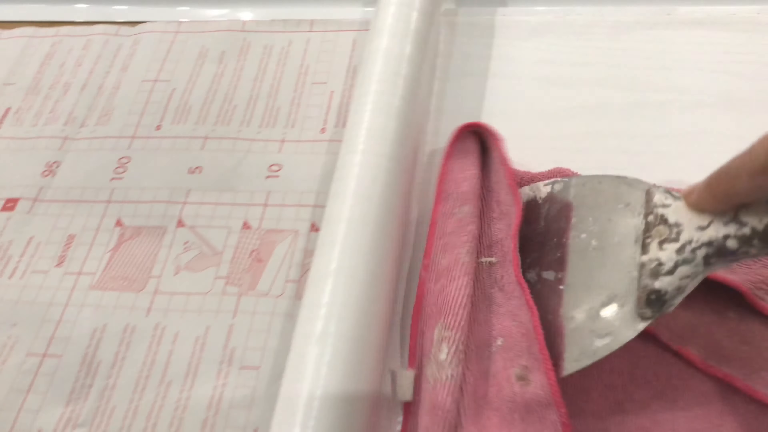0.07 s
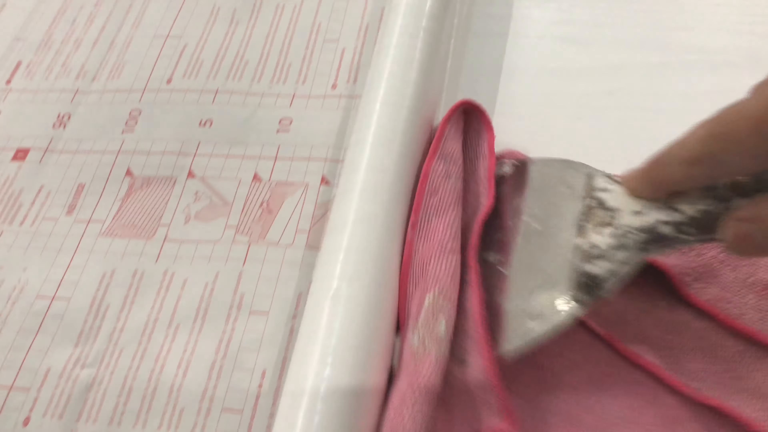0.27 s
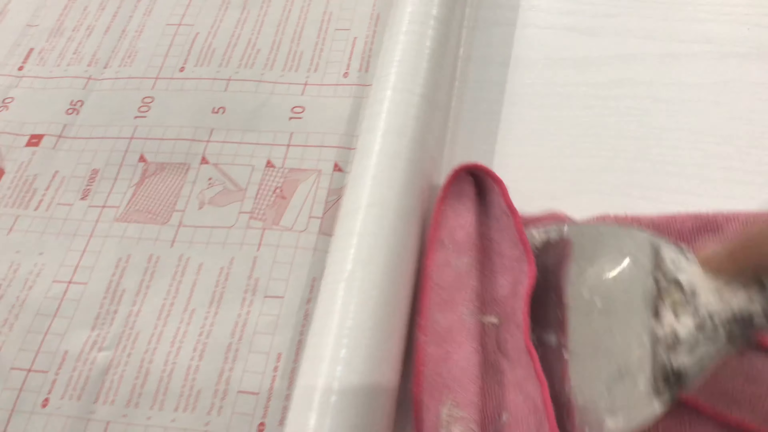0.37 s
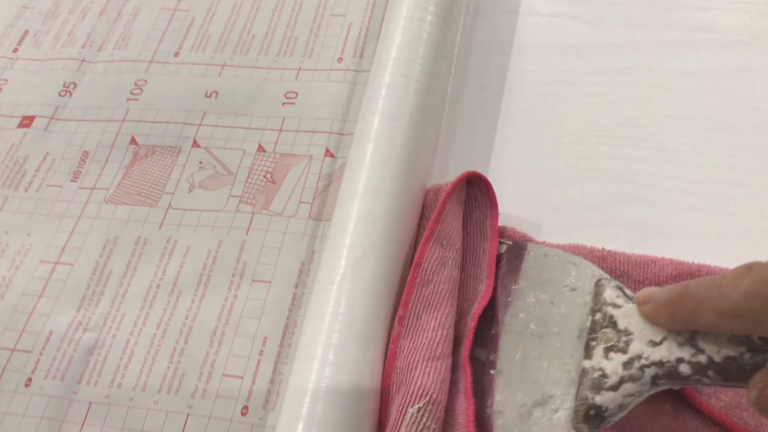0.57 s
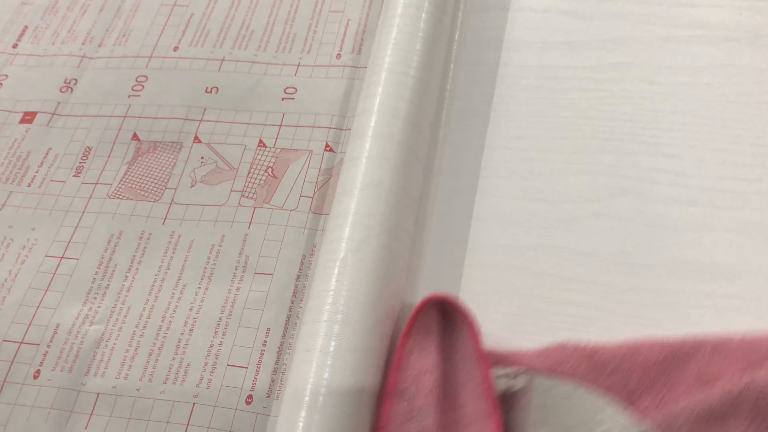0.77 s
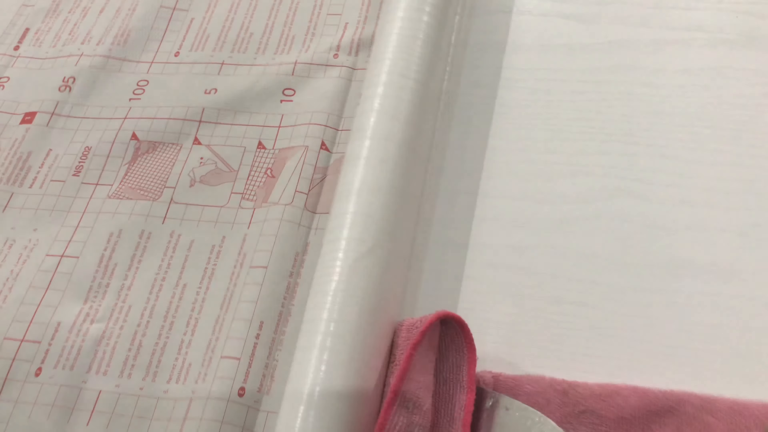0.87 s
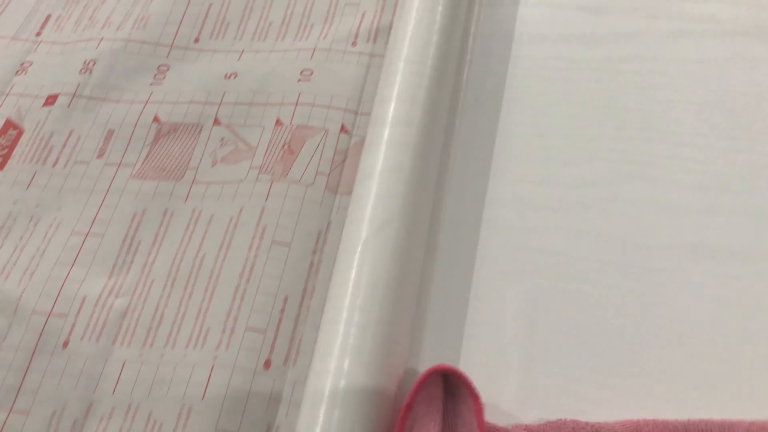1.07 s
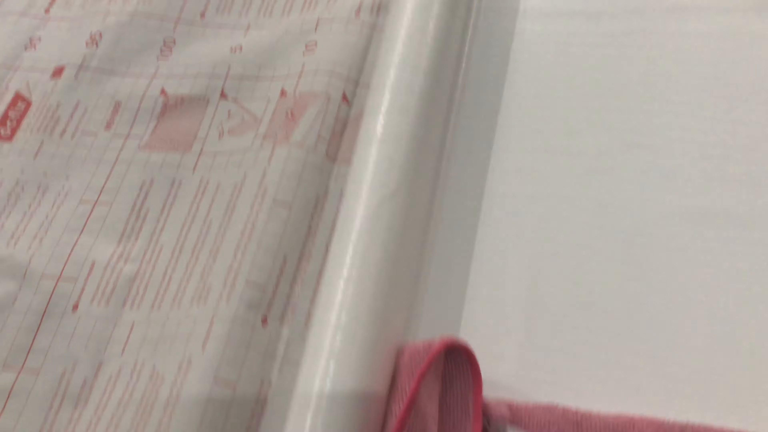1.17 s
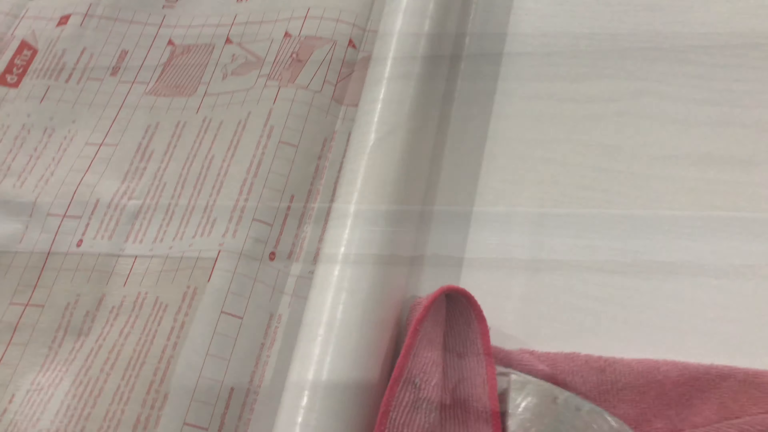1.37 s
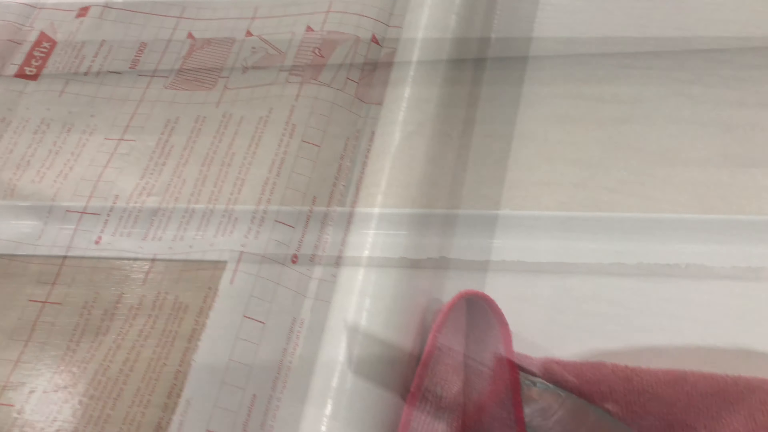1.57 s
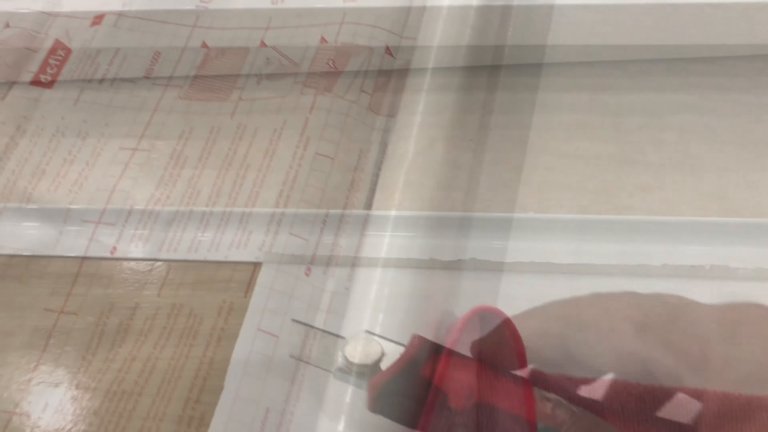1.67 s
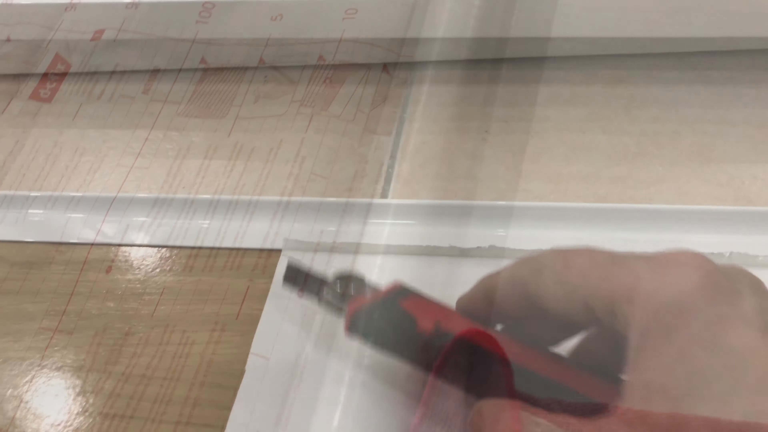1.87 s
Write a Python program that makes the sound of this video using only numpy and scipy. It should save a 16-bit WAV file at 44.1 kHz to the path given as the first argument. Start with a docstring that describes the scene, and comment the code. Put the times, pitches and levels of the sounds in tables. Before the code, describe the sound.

Plastic film being smoothed, heard close in a small, quiet room. Soft cloth rubbing leads to a loud, sharp snap with a short scrape and panel knock at 0.2 s. Weaker snapping scrapes follow near 0.53 and 0.87 s, the latter crisp and crackly. Crease ticks scatter from 1.06 to 1.45 s, the strongest at 1.25. Then faint rubbing sinks into quiet, with a tiny low handling rumble after 1.85 s.

```python
"""In a small room, close by, a putty knife wrapped in cloth pushes self-adhesive film onto a panel.
Each push scrapes over the film with a burst of tiny random slips; knocks and thuds are fading tones
of the panel and its frame. The film snaps in short filtered pulses, and its creases tick and ring.
Filtered noise makes the rubbing cloth and the rumbling hand; near the end only these remain, faintly,
over the quiet noise of the room."""
import sys
import numpy as np
from scipy import signal
from scipy.fft import rfft, irfft
from scipy.io import wavfile

SR = 44100
rng = np.random.default_rng(int(sys.argv[2]) if len(sys.argv) > 2 else 0)


def unload_wav(signal):
    """Save mono or channel-first audio to the path in sys.argv[1] as 16-bit WAV at rate SR, clipped to [-1, 1]."""
    wavfile.write(
        sys.argv[1],
        SR,
        np.round(np.clip(np.atleast_2d(signal).T, -1, 1) * 32767).astype(np.int16),
    )


N = 83790  # length of the scene in samples


def undb(db):
    """Turn decibels into a gain."""
    return 10 ** (np.asarray(db) / 20)


def unit(x):
    """Scale a sound to an average (rms) level of 1."""
    return x / np.sqrt(np.mean(x ** 2))


def clock():
    """Time of each sample in seconds."""
    return np.arange(N) / SR


def curve(points):
    """Gain over time, following (seconds, dB) points."""
    return undb(np.interp(clock(), *np.array(points).T))


def freqs():
    """Frequency of each spectral bin in Hz, at least 1."""
    return np.maximum(np.fft.rfftfreq(N, 1 / SR), 1)


def colour(x, points, tilt_db=0):
    """Shape the spectrum of x by (Hz, dB) points, tilt it by some dB per octave, and scale to rms 1."""
    hz, db = np.array(points).T
    octave = np.log2(freqs())
    gain_db = np.interp(octave, np.log2(hz), db) + tilt_db * octave
    return unit(irfft(rfft(x) * undb(gain_db), N))


def strike(x, points, tilt_db):
    """Shape the spectrum like colour, but with a filter that never sounds ahead of its input."""
    hz, db = np.array(points).T
    octave = np.log2(np.maximum(freqs(), hz[0]))
    gain_db = np.interp(octave, np.log2(hz), db) + tilt_db * octave
    cepstrum = irfft(np.log(undb(gain_db)), N)
    # Keeping only the forward half of the cepstrum, doubled, makes the filter minimum phase.
    sample = np.arange(N)
    forward = 2 * cepstrum * (sample < N // 2) * (sample > 0)
    return irfft(rfft(x) * np.exp(rfft(forward)), N)


def hump(hz, octaves):
    """One broad resonance as a gain per bin."""
    return 1 / (1 + (np.log2(freqs() / hz) / octaves) ** 4) ** .5


def grains(spread_db):
    """Dense tiny slips of uneven size, on about half of the samples."""
    size = undb(spread_db * np.minimum(rng.exponential(size=N), 5))
    present = rng.random(N) < .5
    return rng.standard_normal(N) * size * present


def flicker(count):
    """Random wander through count values spread over the scene, joined by straight lines."""
    return np.interp(np.arange(N), np.linspace(0, N, count), rng.standard_normal(count))


def ring(start, modes, onset, top_hz):
    """Fading tones of alternating sign, set going over onset seconds and softened above top_hz."""
    age = np.maximum(clock() - start, 0)
    waves = 0
    for k, (hz, db, t60) in enumerate(modes):
        fading = undb(db - 60 * age / t60)
        softness = np.sqrt(1 + (hz / top_hz) ** 6)
        waves = waves + (-1) ** k * fading * np.cos(2 * np.pi * hz * age) / softness
    return np.minimum(age / onset, 1) * waves


def room_tone():
    """The quiet room is a steady, faint noise."""
    # Spectrum of the quiet room. Each row: frequency in Hz, density in dB per Hz.
    tone_spectrum = [(20, 1.5), (50, -1), (95, 4), (140, -1.5), (300, -11), (1000, -18.5), (4000, -18),
                     (15500, -30.5)]
    return undb(-69) * colour(rng.standard_normal(N), tone_spectrum)


def room(x):
    """Add reflections from the surfaces at hand, then a short tail that loses its treble first."""
    near_db, near_s = -16, 0.01  # level and fading time of the early reflections
    tail_db, t60_s, treble_t60_s = -17.5, .33, .22  # t60: seconds to fall by 60 dB
    t = clock()
    low = 1 / (1 + (freqs() / 7000) ** 6)
    spectrum = rfft(rng.standard_normal(N))
    body = irfft(spectrum * low, N)
    treble = undb(-5) * irfft(spectrum * (1 - low), N)
    tail = body * undb(-60 * t / t60_s) + treble * undb(-60 * t / treble_t60_s)
    tail = tail * (t > near_s)
    near = (body + treble) * (t > .0012) * np.exp(-(t / near_s) ** 2)
    response = (undb(near_db) * unit(near) + undb(tail_db) * unit(tail)) / np.sqrt(N)
    return x + signal.fftconvolve(x, response)[:N]


def hand():
    """The hand and tool make a low rumble of noise that swells and sinks."""
    # Loudness of the rumble. Each row: time in seconds, level in dB.
    rumble_level = [(0, -62), (.12, -60), (.19, -49.5), (.28, -59.5), (.4, -59.5), (.47, -55.5),
                    (.55, -54.5), (.65, -61), (.85, -57), (1.05, -63), (1.17, -55.5), (1.25, -52),
                    (1.35, -57.5), (1.42, -66), (1.5, -71.5), (1.845, -83), (1.872, -54), (1.9, -56.5)]
    # Spectrum of the rumble. Each row: frequency in Hz, density in dB per Hz.
    rumble_spectrum = [(20, -6.5), (45, -4), (92, 1.5), (130, -12.5), (190, -0.5), (260, 4), (340, -8.5),
                       (500, -11.5), (1500, -45.5), (15000, -76.5)]
    return curve(rumble_level) * colour(rng.standard_normal(N), rumble_spectrum)


def cloth():
    """Fibres hiss over the film, swelling into a hollow, gliding swish on each slide."""
    # Loudness of the rubbing. Each row: time in seconds, level in dB before the flicker.
    rub_level = [(0, -51), (.05, -52.5), (.085, -58.5), (.13, -54.5), (.185, -50.5), (.3, -47), (.36, -50),
                 (.43, -56), (.5, -54.5), (.62, -50.5), (.71, -52), (.77, -54), (.85, -52), (.94, -50.5),
                 (1.04, -49.5), (1.085, -59), (1.2, -48), (1.24, -55), (1.275, -49), (1.325, -58.5),
                 (1.38, -56.5), (1.44, -60), (1.52, -64.5), (1.58, -58.5), (1.625, -66), (1.69, -67.5),
                 (1.82, -75.5), (1.85, -73.5), (1.865, -62.5), (1.9, -61.5)]
    # Spectrum of the rubbing. Each row: frequency in Hz, density in dB per Hz.
    rub_spectrum = [(100, -13), (400, 0), (800, 2), (1600, 0), (3400, -2.5), (6000, -7), (8500, -9),
                    (10300, -12.5), (12500, -8), (15500, -10.5)]
    # Swishes of the cloth sliding on the film. Each row: middle in seconds, half length in seconds,
    # level in dB, centre in Hz at the middle, glide in octaves per second.
    slides = [(0.018, 0.029, -54, 1200, -2), (0.347, 0.025, -50.5, 1220, 3.5),
              (0.702, 0.032, -53, 1180, -2.5), (1.028, 0.028, -54.5, 1180, 2),
              (1.572, .036, -64, 1120, -0.5)]
    grain_db, flicker_db, width_octaves = 0.5, 2.13, 0.44
    hiss = colour(grains(grain_db), rub_spectrum)
    out = curve(rub_level) * undb(flicker_db * flicker(count=130)) * hiss
    for middle, half, db, hz, glide in slides:
        since = clock() - middle
        swish = unit(irfft(rfft(grains(grain_db)) * hump(hz, width_octaves), N))
        # Reading the noise faster or slower glides its pitch.
        speed = 2 ** (glide * np.clip(since, -2 * half, 2 * half))
        swish = np.interp(np.cumsum(speed) % N, np.arange(N), swish)
        out = out + undb(db) * np.exp(-.5 * (since / half) ** 2) * swish
    return out


def creases():
    """A crease ticks through the sheet, treble first; folds scatter it and its own facet rings briefly."""
    # Creases that tick. Each row: start in seconds, level in dB (of the tick's energy packed into 3 ms),
    # ring in Hz, level of the ring against the tick in dB, top of the tick in Hz.
    ticks = [(0.125, -55, 3680, 4, 6060), (.373, -51, 1700, 7, 3900), (.511, -39.5, 2650, -5, 5300),
             (1.063, -46, 3490, 0, 6400), (1.0658, -35.5, 2580, 0, 6600), (1.0958, -42, 2700, -7, 8400),
             (1.1323, -44.5, 2550, -3, 5560), (1.2463, -27.5, 2220, -5, 9700), (1.2594, -52, 3020, 6, 6000),
             (1.2874, -37.5, 3600, -4.5, 8750), (1.3027, -48.5, 2730, -4, 5900),
             (1.3898, -46.5, 2520, -32, 4000), (1.3989, -39, 2820, -9.5, 5100),
             (1.4257, -45.5, 3200, -5, 6940), (1.455, -51.5, 1520, -5, 4500)]
    # Spectrum of the film sheet. Each row: frequency in Hz, density in dB per Hz.
    sheet_spectrum = [(100, -25.5), (400, -7.5), (700, -7.5), (1100, -2.5), (1600, 2), (3200, 1.5),
                      (4700, -1), (8000, -1.5), (15500, -8)]
    spread_ms, ring_ms = 2.0, .9  # how far low tones lag behind, time scale of the facet's ring
    scatter_db, scatter_ms, treble_scatter_ms = 0, 3.4, 1.0
    f, t, out = freqs(), clock(), 0
    travel = spread_ms / 1000 * np.maximum(np.sqrt(1000 / np.maximum(f, 500)) - .32, 0)
    treble = 1 / (1 + (5000 / f) ** 4)
    for start, db, hz, ring_db, top_hz in ticks:
        folds = rng.standard_normal(N)
        slow = rfft(unit(folds * np.exp(-t * 1000 / scatter_ms))) / np.sqrt(N)
        fast = rfft(unit(folds * np.exp(-t * 1000 / treble_scatter_ms))) / np.sqrt(N)
        scatter = 1 + undb(scatter_db) * (slow * (1 - treble) + fast * treble)
        # Adding up the delays along frequency gives the phase of a pulse whose tones arrive in turn.
        phase = -2j * np.pi * np.cumsum(start + travel) * SR / N
        spectrum = scatter * np.exp(phase) / np.sqrt(1 + (f / top_hz) ** 10)
        tick = colour(irfft(spectrum, N), sheet_spectrum)
        age = np.maximum(t - start, 0)
        u = age * 1000 / ring_ms
        facet = unit(u ** 2 * np.exp(-u) * np.sin(2 * np.pi * hz * age))
        out = out + undb(db) * (tick + undb(ring_db) * facet) * np.sqrt(.003 * SR / N)
    return out


def snaps():
    """The film lets go in a crack only a cycle or two long, and flutters for a moment."""
    # Sharp snaps. Each row: start in seconds, peak in dB before the room is added,
    # treble tilt in dB per octave, flutter against the crack in dB.
    cracks = [(.2047, -.5, 0, -20), (.2618, -31, 7, -5), (.5265, -19, -2, -15), (.5293, -15, 2, -12),
              (.5375, -24, 4, 0), (.5678, -28, 5, 0), (.8668, -16.5, -1, 2), (.8696, -17, 2, 3),
              (.8753, -12, 11, -4), (.8858, -15, 14, 2)]
    # Spectrum of a snap. Each row: frequency in Hz, density in dB per Hz.
    crack_spectrum = [(100, -19.5), (350, -7), (1000, -9), (1450, -14.5), (2000, -5.5), (3200, 4),
                      (4700, -4.5), (6200, 0), (7800, -14), (9300, -8), (11000, -20.5), (15500, -22)]
    flutter_ms = 1.0  # fading time
    out = 0
    for start, db, tilt, flutter_db in cracks:
        samples = np.arange(N) - int(start * SR)
        fading = np.exp(-np.abs(samples) / SR * 1000 / flutter_ms)
        flutter = rng.standard_normal(N) * (samples > 0) * fading
        pulse = (samples == 0) + undb(flutter_db) * unit(flutter) / np.sqrt(N)
        crack = strike(pulse, crack_spectrum, tilt)
        out = out + undb(db) * crack / np.abs(crack).max()
    return out


def knocks():
    """The padded blade lands on the panel, which rings briefly."""
    # Knocks on the panel. Each row: start in seconds, gain in dB,
    # top in Hz set by the softness of the contact.
    landings = [(0.2044, -22.5, 1500), (0.5263, -24.5, 475), (0.865, -31.5, 1100)]
    # Tones of the panel. Each row: frequency in Hz, level in dB, seconds to fall by 60 dB.
    panel_modes = [(342.4, -10, 0.031), (431.4, 0, 0.037), (510, -7, 0.031), (547, -3, .06),
                   (613, -5.5, 0.044), (913, -13.5, .04), (1000, -6.5, 0.02)]
    return sum(undb(db) * ring(start, panel_modes, onset=0.00033, top_hz=top_hz)
               for start, db, top_hz in landings)


def thuds():
    """The panel's frame takes the load with low tones that build more slowly."""
    # Thuds of the frame. Each row: start in seconds, gain in dB.
    loads = [(.203, -34), (0.535, -41.5), (0.861, -41), (1.15, -56)]
    # Low tones of the frame. Each row: frequency in Hz, level in dB, seconds to fall by 60 dB.
    frame_modes = [(54.7, -4.5, 0.17), (96, 2.5, 0.19)]
    return sum(undb(db) * ring(start, frame_modes, onset=0.035, top_hz=200) for start, db in loads)


def scrapes():
    """Each push is a burst of slips that builds, holds and dies away."""
    # Pushes of the blade. Each row: start in seconds, rise in seconds, hold in seconds,
    # fade in dB per second, level in dB before the slip flicker, treble tilt in dB per octave.
    pushes = [(0.196, 0.0095, 0.0029, 466.5, -26.5, 2), (0.523, 0.0038, 0.013, 361.5, -33, 1.5),
              (0.551, 0.0028, 0.014, 424, -39, 9), (0.853, 0.013, 0.012, 426.5, -28.5, 3.65),
              (1.148, .012, 0.024, 629, -39, 1.37)]
    # Spectrum of the scraping before the tilt. Each row: frequency in Hz, density in dB per Hz.
    scrape_spectrum = [(100, 2), (300, -16), (500, 5.5), (1000, 4.5), (1500, 1.5), (2200, 1), (3300, 1),
                       (4800, -4.5), (6500, -7.5), (8000, -10), (10500, -17), (15500, -20)]
    grain_db, slip_db = 4.97, 2.5  # unevenness of the slips, depth of the level flicker
    t, out = clock(), 0
    for start, rise, hold, fade, db, tilt in pushes:
        build = np.clip((t - start) / rise, 0, 1) ** 2
        dying = undb(-fade * np.maximum(t - start - rise - hold, 0))
        level = undb(db + slip_db * flicker(count=800))
        out = out + level * build * dying * colour(grains(grain_db), scrape_spectrum, tilt)
    return out


def scene():
    """Pushes, snaps, ticks, knocks and thuds get reflections; the room tone, hand and cloth do not."""
    background = room_tone() + hand() + cloth()
    work = creases() + snaps() + knocks() + thuds() + scrapes()
    return (background + room(work))[None]


def record(dry):
    """The recorder cuts the treble steeply above 16.1 kHz."""
    top_cut = signal.ellip(10, .1, 80, 16100, fs=SR, output="sos")
    return signal.sosfilt(top_cut, dry)


dry = scene()
out = record(dry)
unload_wav(out)
```